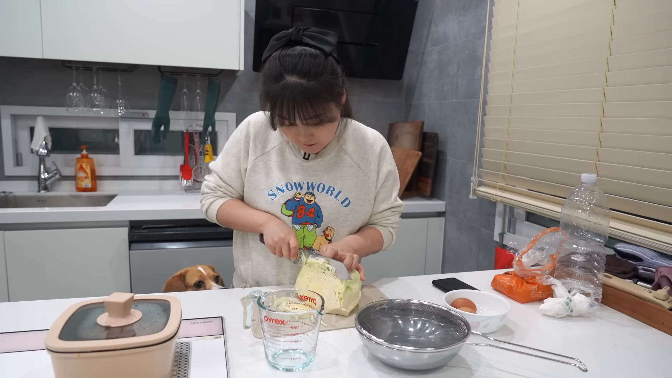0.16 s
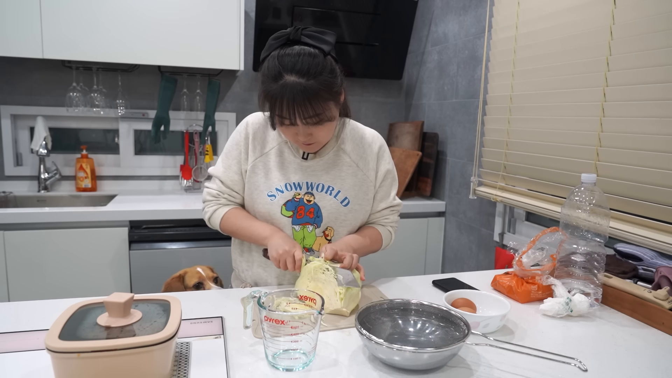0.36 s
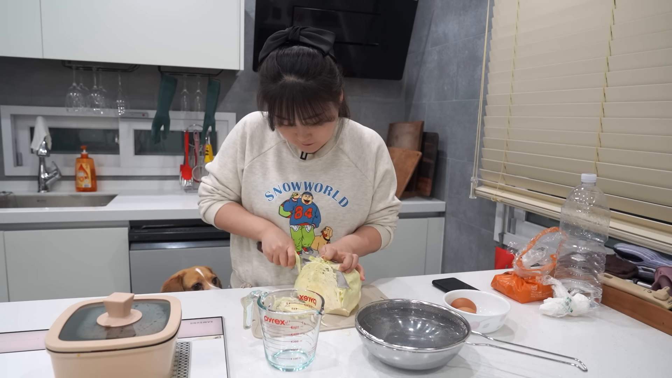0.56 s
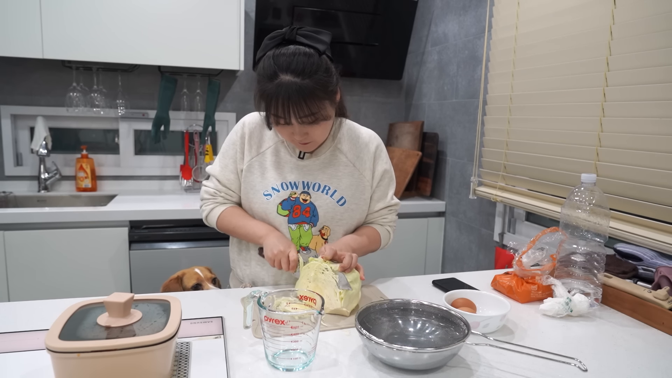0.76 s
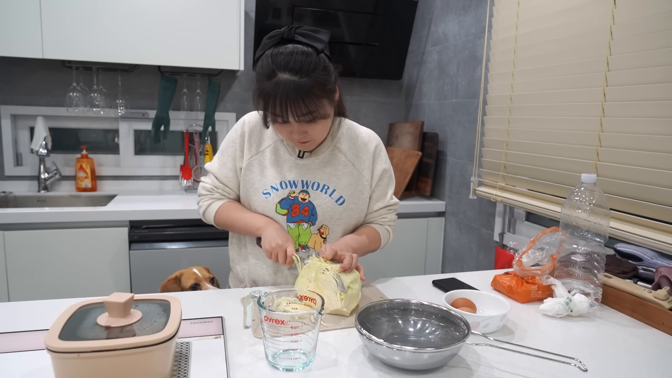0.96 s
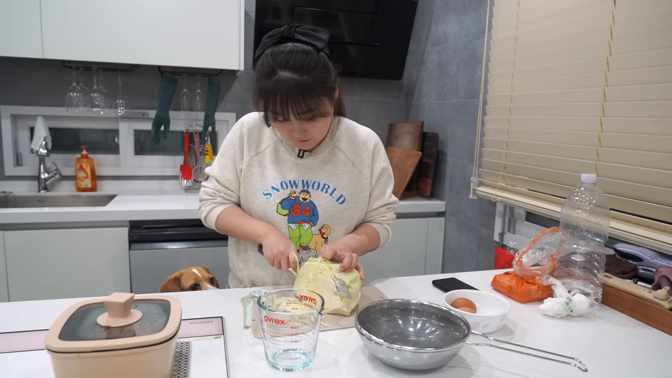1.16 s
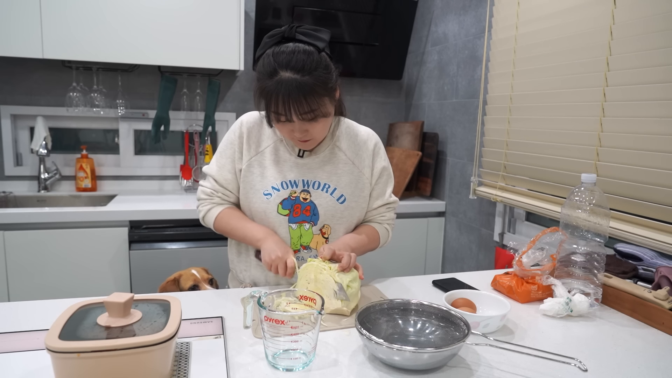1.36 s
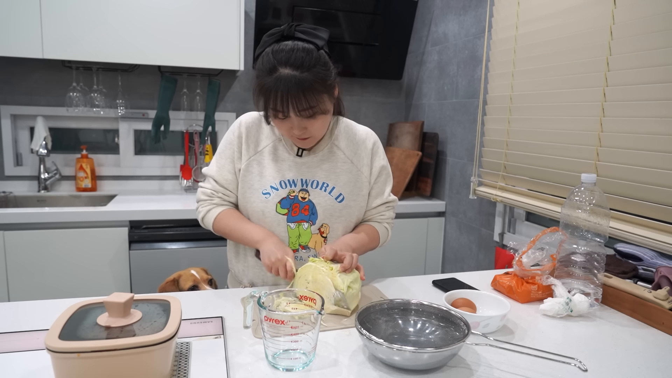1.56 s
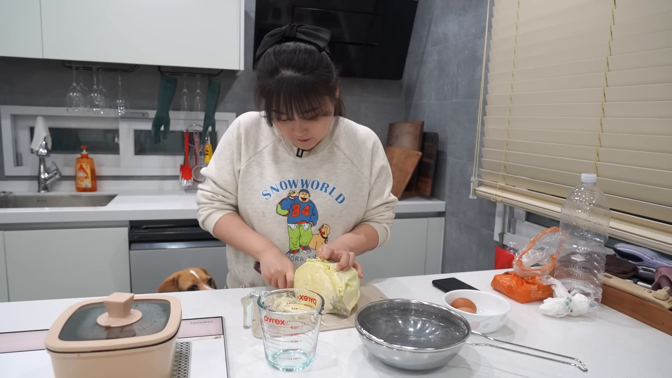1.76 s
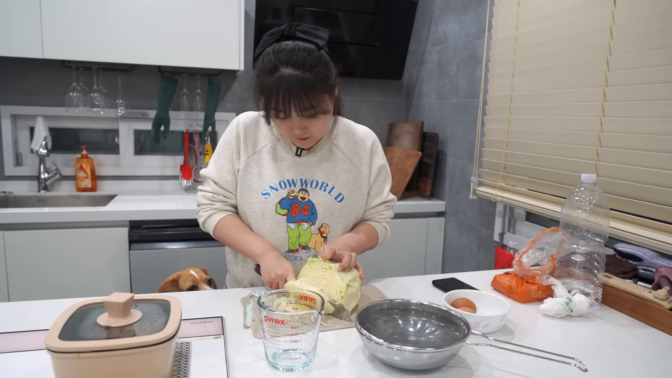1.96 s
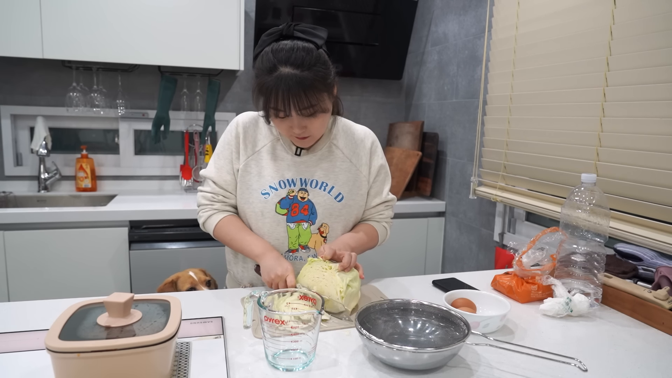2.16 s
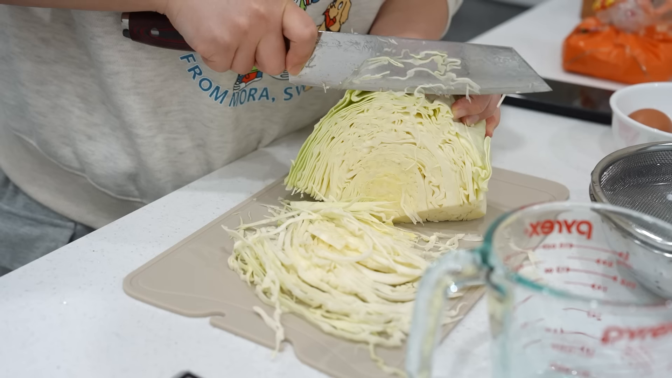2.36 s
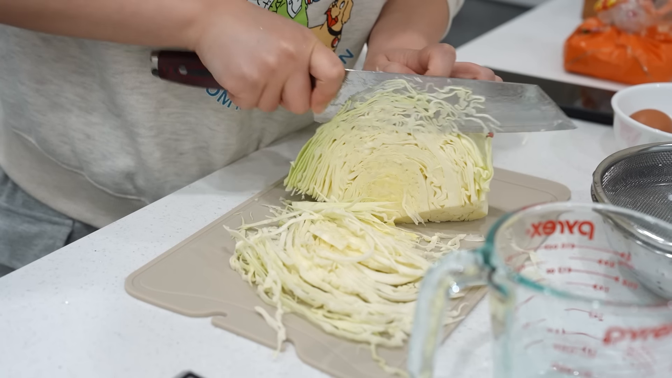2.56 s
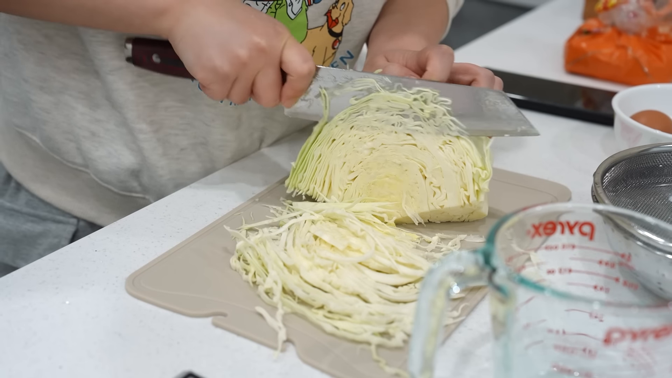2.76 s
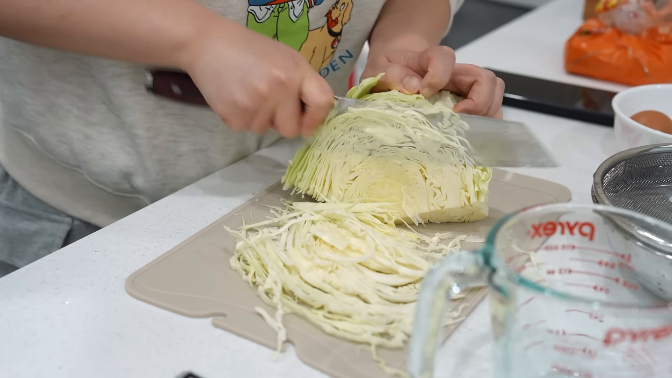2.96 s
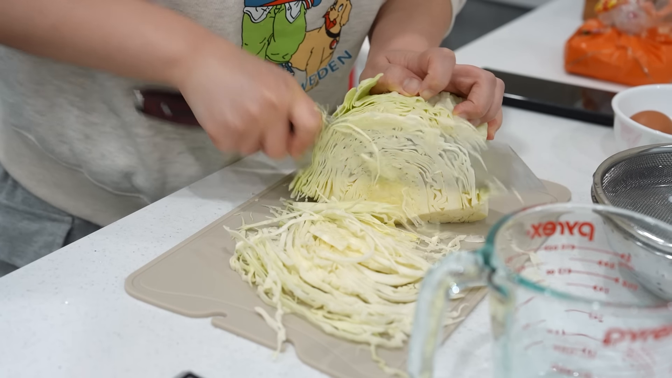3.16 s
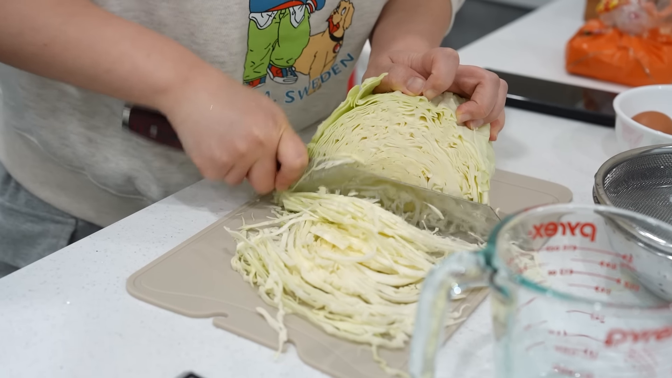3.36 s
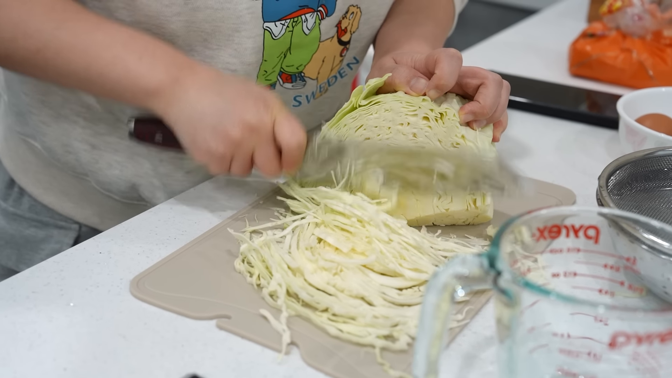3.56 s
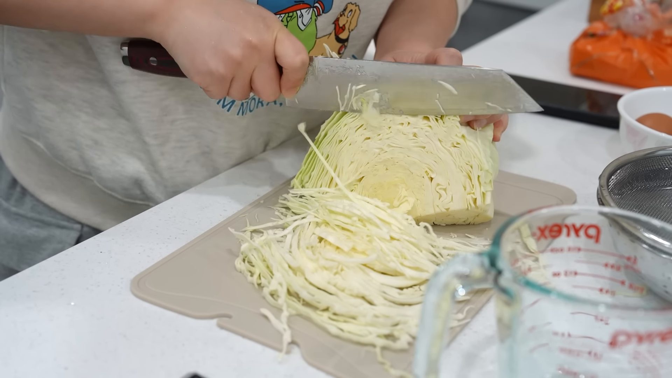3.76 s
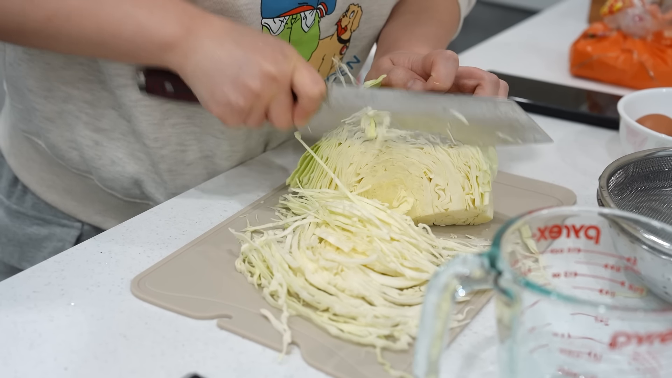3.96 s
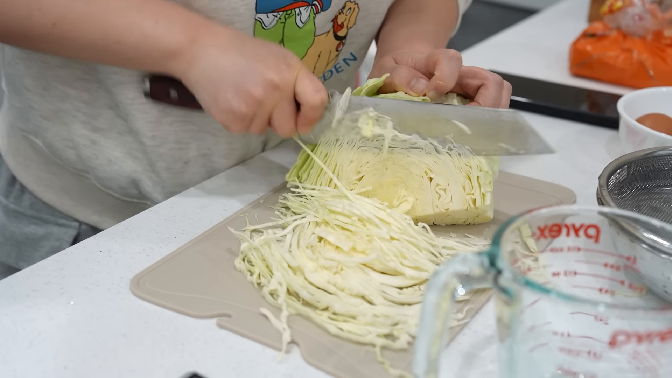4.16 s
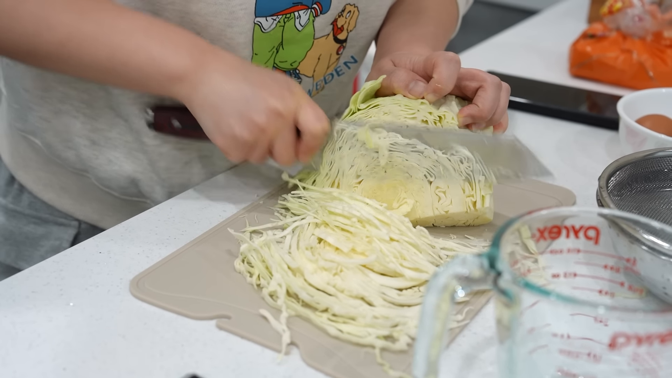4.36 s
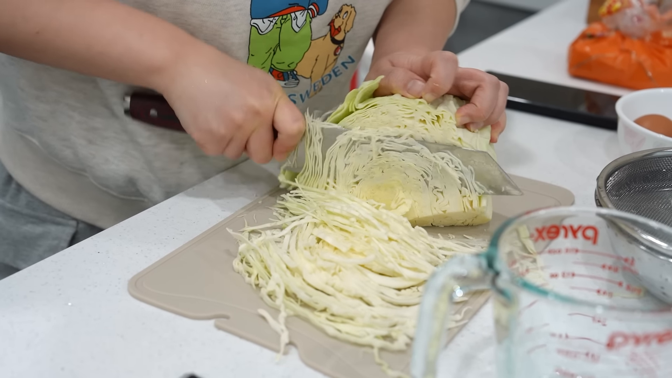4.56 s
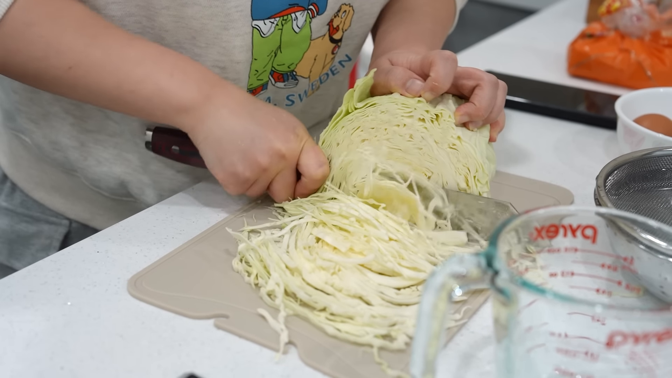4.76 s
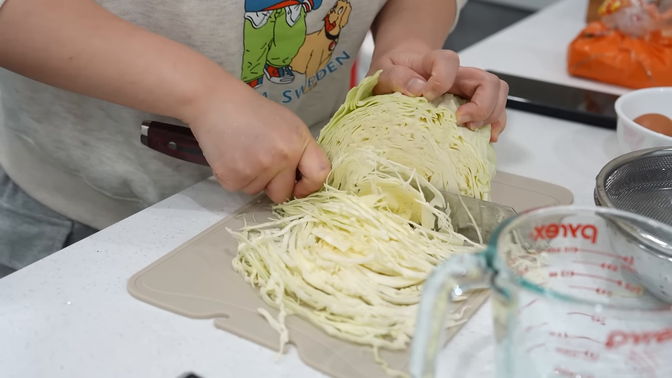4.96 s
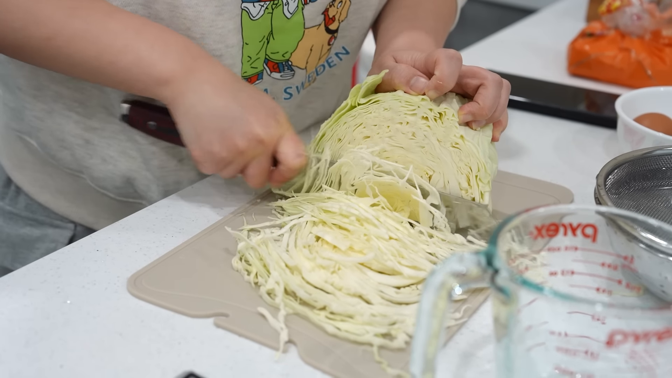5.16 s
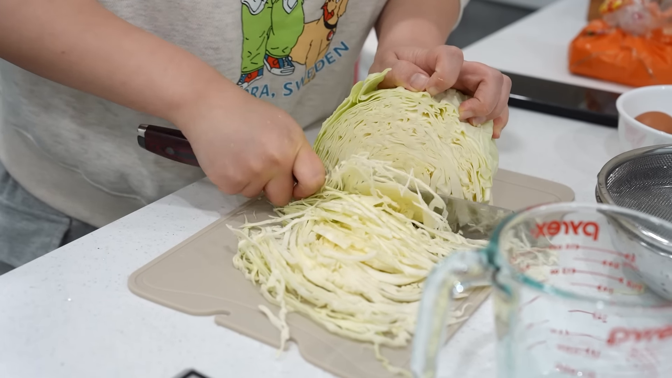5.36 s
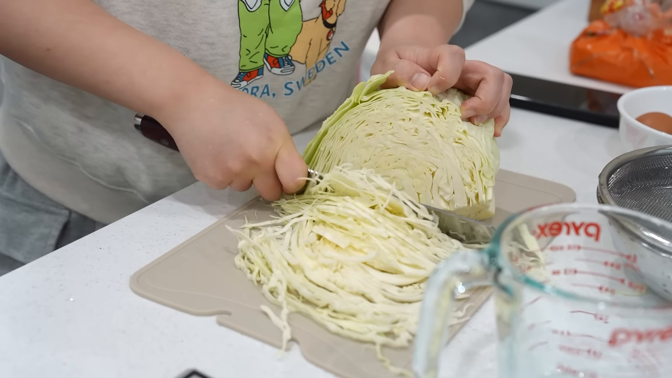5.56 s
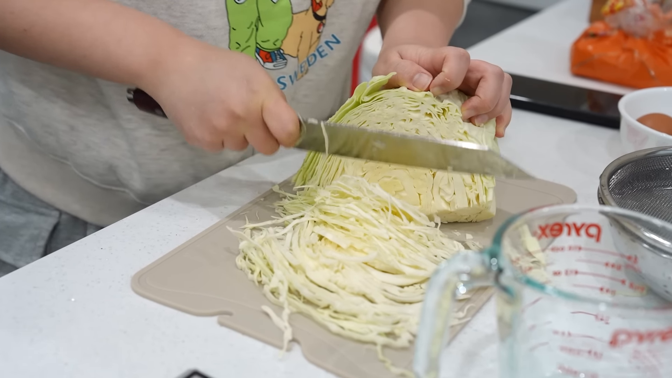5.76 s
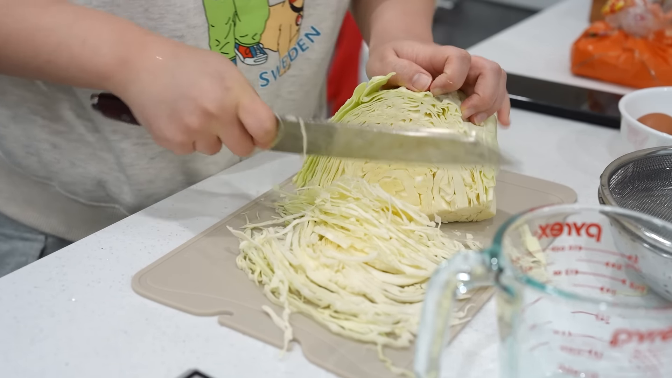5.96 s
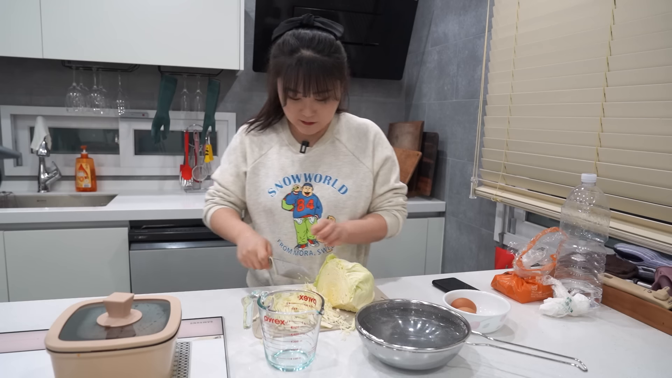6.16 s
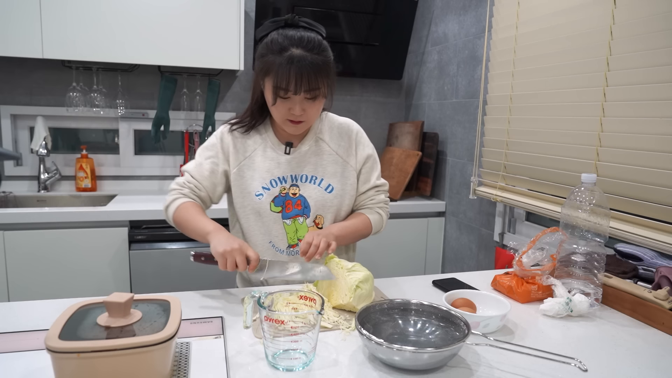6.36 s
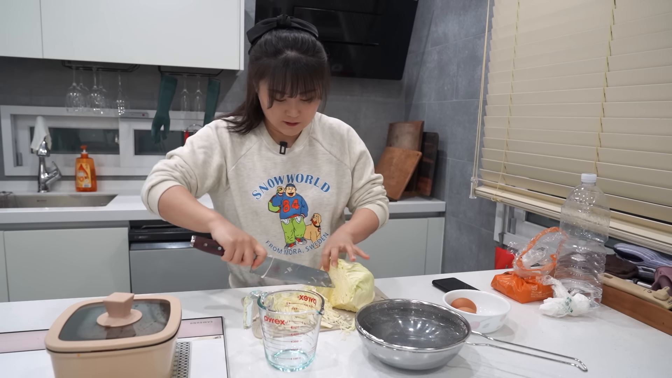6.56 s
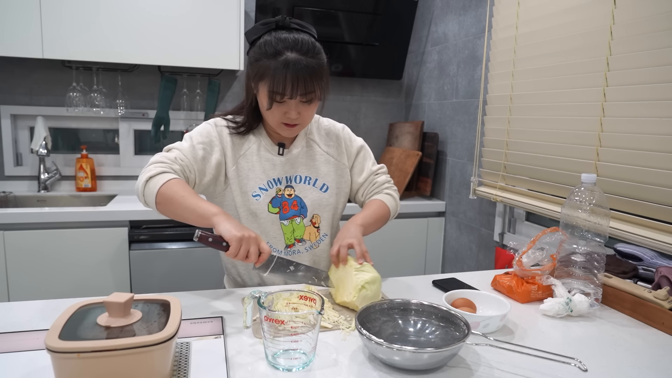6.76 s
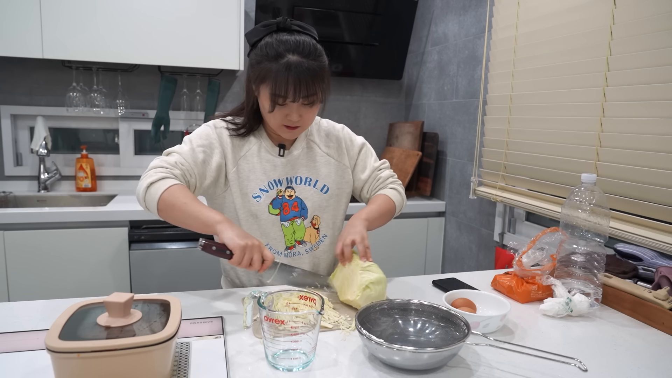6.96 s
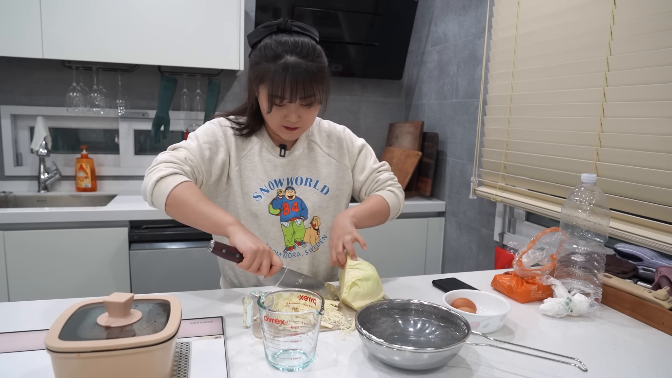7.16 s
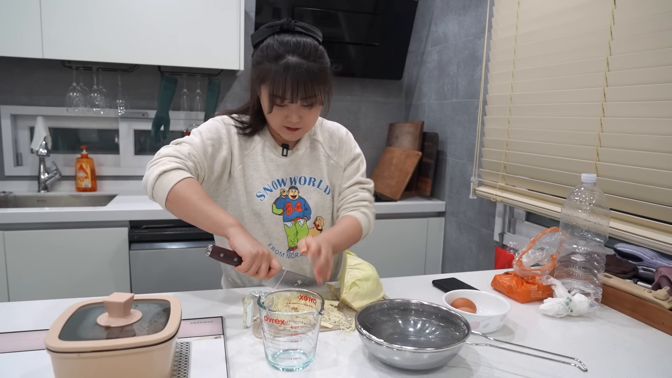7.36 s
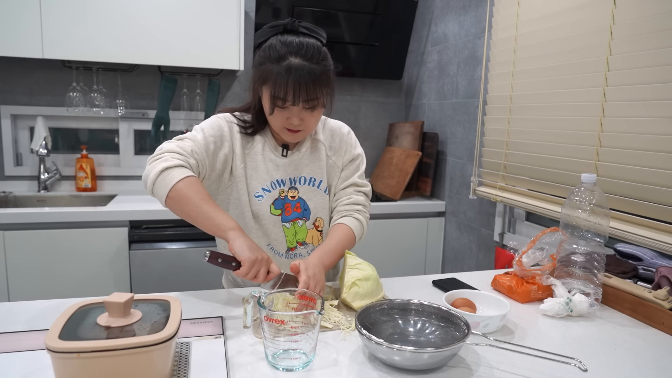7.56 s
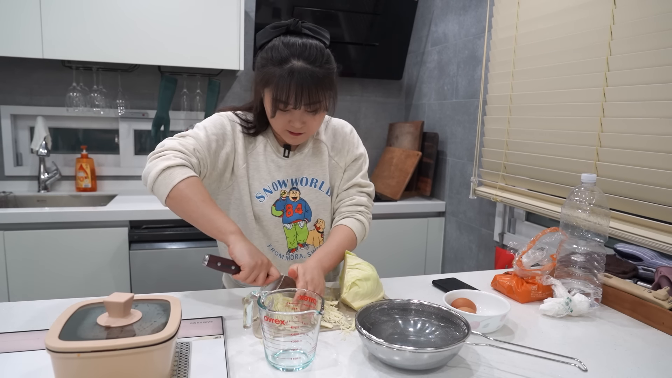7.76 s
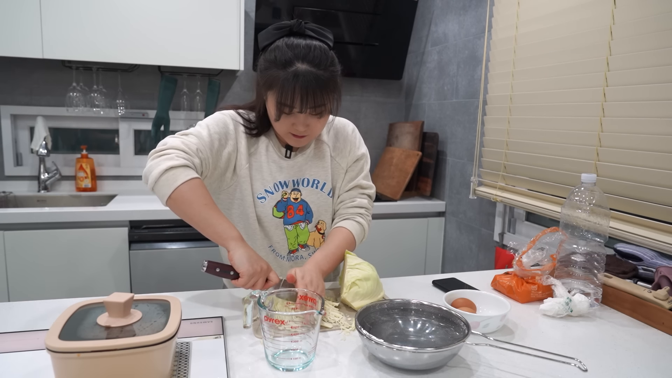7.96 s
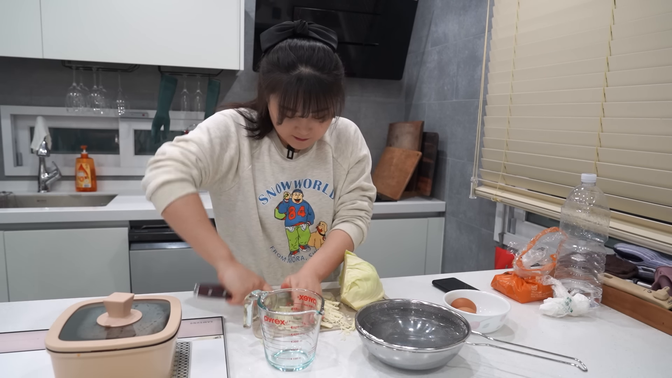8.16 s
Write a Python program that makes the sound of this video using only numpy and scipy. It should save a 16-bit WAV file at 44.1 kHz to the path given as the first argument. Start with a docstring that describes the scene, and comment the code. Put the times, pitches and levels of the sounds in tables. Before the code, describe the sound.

Dense crackling crunches from a blade slicing fresh cabbage, recorded close in stereo, slightly left, with short kitchen reflections and a faint room hush. Brisk strokes first, then a slow squeaking push ending on the board. Crisp snaps and rapid tearing strokes fill the middle, including a strong thud. Rustling strips thin out to near quiet before another slow, lightly tapping, squeaky cut and a last short stroke.

```python
"""A kitchen knife cuts up a wedge of cabbage on a plastic board, heard close up in a small kitchen.
Quick crunching strokes come first, then a slow cut with a squeak that rises as the wet blade slips.
Thick ribs then snap and tear amid more quick strokes; a few cuts go right through and knock on the board.
Loose strips rustle under the sliding blade, and a second slow, squeaky cut leads to one last quick stroke.
The crunch is a swarm of tiny random bursts, the snaps and knocks are short fading notes and noise."""
import sys
import numpy as np
from scipy import signal
from scipy.fft import rfft, irfft, next_fast_len
from scipy.io import wavfile
from scipy.ndimage import map_coordinates

SR = 44100
rng = np.random.default_rng(int(sys.argv[2]) if len(sys.argv) > 2 else 0)


def inscribe(sig):
    """Save sig as 16-bit PCM at rate SR to the path in sys.argv[1].

    A 1-D sig is mono; a 2-D sig holds one channel per row.
    Samples are clipped to [-1, 1] before scaling.
    """
    pcm = np.round(np.clip(np.atleast_2d(sig).T, -1, 1) * 32767)
    wavfile.write(sys.argv[1], SR, pcm.astype(np.int16))


N = 362061  # length in samples
TOP_HZ = 15900  # upper limit of the sound


def amp(db):
    """Decibels to gain."""
    return 10 ** (np.asarray(db) / 20)


def unit(x):
    """Scale to an rms (average strength) of 1."""
    return x / np.sqrt(np.mean(x ** 2) + 1e-20)


def along(points, hz):
    """Read (pitch_hz, value) points at any pitch, on a log axis."""
    point_hz, value = np.transpose(points)
    return np.interp(np.log(hz + 1), np.log(point_hz + 1), value)


def curves(rows):
    """One value per sample for each column after the time."""
    time_s, *columns = np.transpose(rows)
    return [np.interp(np.arange(N) / SR, time_s, column) for column in columns]


def wobble(rate):
    """A smooth random curve with rate random points a second."""
    knots = rng.standard_normal(int(N * rate / SR) + 4)
    return map_coordinates(knots, [np.arange(N) * rate / SR])


def filtered(x, response):
    """Multiply the spectrum of x by a response that depends on pitch."""
    size = next_fast_len(N + SR // 2)
    return irfft(rfft(x, size) * response(np.fft.rfftfreq(size, 1 / SR)), size)[..., :N]


def coloured(x, spectrum, size=2048):
    """Give x a spectrum with a filter that only looks back, so that clicks keep a sharp front."""
    cepstrum = irfft(np.log(amp(along(spectrum, np.fft.rfftfreq(size, 1 / SR)))))
    # folding the second half onto the first makes the filter answer as early as possible
    cepstrum[1:size // 2] *= 2
    cepstrum[size // 2 + 1:] = 0
    return signal.oaconvolve(x, irfft(np.exp(rfft(cepstrum))))[:len(x)]


def band(x, hz, kind, order=2):
    """Low-, high- or band-pass filter that only looks back in time."""
    edges_hz = np.clip(hz, 20, .49 * SR)
    return signal.sosfilt(signal.butter(order, edges_hz, kind, fs=SR, output="sos"), x)


def add(track, start_s, sound):
    """Mix a sound into the track from start_s."""
    part = track[round(start_s * SR):][:len(sound)]
    part += sound[:len(part)]


def bursts(rate, spread_db):
    """Cells bursting at random moments, rate a second, in unequal sizes."""
    happens = rng.random(N) < rate / SR
    size = amp(spread_db * np.clip(rng.standard_normal(N), -2.5, 2.5))
    return happens * size * rng.choice([-1, 1], N) / np.sqrt(rate)


def patchy(x, depth_db, size=512):
    """Every leaf has its own pitch, so the colour of the tearing keeps shifting."""
    z = signal.stft(x, nperseg=size)[2]
    patch = np.outer(np.hanning(8), np.hanning(8))
    field = signal.fftconvolve(rng.standard_normal(z.shape), patch, "same")
    return unit(signal.istft(z * amp(depth_db * unit(field)), nperseg=size)[1][:N])


# colour of the room tone: pitch_hz, level_db (per Hz, relative)
ROOM_COLOUR = [(15, -48), (25, -5.5), (247, -8), (307, -1), (380, -6), (585, -2.5), (1060, -6.5),
               (1180, -5), (1280, -7.5), (2380, -4), (3200, -11.5), (6280, 1), (7790, -23), (10500, -9),
               (15700, -26.5)]


def room_tone(level_db=-51.5):
    """A faint steady hush of coloured noise, mostly alike in both channels."""
    air = rng.standard_normal(N) + .5 * rng.standard_normal((2, N))
    return amp(level_db) * unit(filtered(air, lambda hz: amp(along(ROOM_COLOUR, hz))))


# how long the echoes take to fade by 60 dB: pitch_hz, fade_s
ECHO_FADE = [(100, 0.71), (500, 0.45), (2000, 0.71), (6000, 0.2), (14000, 0.35)]
# how strong the echoes are: pitch_hz, level_db
ECHO_LEVEL = [(100, -7.5), (400, -7.5), (1200, -8.5), (2000, -13.5), (4000, -14.5), (14000, -10.5)]


def kitchen(x, unlike=0.99):
    """Hard walls and cupboards answer with fading noise, partly alike in the two channels."""
    length = SR * 3 // 4
    echoes = unit(rng.standard_normal(length) + unlike * rng.standard_normal((2, length)))
    hz, t, z = signal.stft(echoes, SR, nperseg=256)
    fade_s = along(ECHO_FADE, hz)[:, None]
    fading = amp(along(ECHO_LEVEL, hz)[:, None] - 60 * t / fade_s)
    same_energy = np.sqrt(2 * np.log(1000) / (fade_s * SR))  # long and short fades carry equal energy
    tail = signal.istft(z * fading * same_energy, SR, nperseg=256)[1]
    delayed = np.pad(x, (SR // 250, 0))  # the echoes start 4 ms late
    return signal.fftconvolve(delayed[None], tail, axes=1)[:, :N]


# dull taps of the blade against the wedge: start_s, level_db, pitch_hz, fade_s (time to fall 60 dB)
WEDGE_TAPS = [(3.762, -26, 615, 0.04), (4.256, -31, 545, 0.09), (4.270, -28, 511, 0.1),
              (4.923, -36, 1180, .08), (6.717, -33, 600, .03), (6.748, -23.5, 596, 0.027),
              (6.79, -34, 480, 0.026), (6.881, -23.5, 1810, 0.028), (6.897, -34, 666, 0.055),
              (7.001, -26.5, 617, 0.03)]


def taps():
    """The wedge answers a light tap with one short hollow note."""
    track, t = np.zeros(N), np.arange(SR // 8) / SR
    for start_s, level_db, pitch_hz, fade_s in WEDGE_TAPS:
        add(track, start_s, amp(level_db - 60 * t / fade_s) * np.sin(2 * np.pi * pitch_hz * t))
    return band(track, 460, "highpass")


# the blade meeting the board: start_s, peak_db, low_hz, high_hz (edges of the band that the contact passes)
BOARD_KNOCKS = [(0.661, -31, 298, 560), (1.099, -30, 265, 700), (1.848, -6.5, 214, 1310),
                (3.303, -2.5, 273, 1930), (3.759, -35, 400, 1490), (4.783, -17, 55, 216),
                (7.904, -35, 55, 400)]
# notes of the board on the counter: pitch_hz, level_db (before a small random change), fade_s (to fall 60 dB)
BOARD_NOTES = [(139, -8, .28), (175, -12.5, 0.22), (234, -10.5, 0.27), (305.7, -4, 0.22), (362, -18, 0.23),
               (402, -2.5, 0.08), (484, -6, 0.078), (542, -6, 0.1), (634, -15, 0.25), (824, -14.5, 0.27),
               (890, -20, .14), (1126, -18, .2), (1206, -3.5, 0.15)]


def knocks(push_s=0.00053, push=8, clatter_size=0.99, clatter_fade_s=0.2):
    """One push on the board, then board and counter ring; cabbage under the edge softens the contact."""
    track, t = np.zeros(N), np.arange(SR // 2) / SR
    for start_s, peak_db, low_hz, high_hz in BOARD_KNOCKS:
        ring = 0
        for pitch_hz, level_db, fade_s in BOARD_NOTES:
            fading = amp(level_db + rng.normal(0, 1) - 60 * t / fade_s)
            ring = ring + fading * np.sin(2 * np.pi * (pitch_hz * t + rng.random()))
        shove = push * np.e * (t / push_s) * (1 - t / push_s / 2) * np.exp(-t / push_s)
        # the counter and the dishes on it add a crowd of small resonances
        crowd = unit(band(rng.standard_normal(len(t)), [250, 2200], "bandpass"))
        clatter = clatter_size * crowd * amp(-60 * t / clatter_fade_s)
        onset = 1 - np.exp(-t / 0.00031)
        knock = band(shove + (ring + clatter) * onset, [low_hz, high_hz], "bandpass")
        add(track, start_s, amp(peak_db) * knock / np.abs(knock).max())
    return track


def tremor(body_gain, level_db=-19):
    """The tearing shakes the wedge, and the board under it rumbles faintly."""
    rumble = unit(band(rng.standard_normal(N), [75, 170], "bandpass"))
    return body_gain * amp(level_db) * rumble


# the wet blade squeaking, one list for each slow cut: time_s, pitch_hz, level_db, upper_level_db
SLOW_SQUEAKS = [
    [(1.27, 4320, -54, -70), (1.42, 4676, -34, -33), (1.55, 4840, -32.5, -50), (1.7, 4810, -32, -51),
     (1.79, 5070, -27, -36), (1.86, 5220, -39, -46), (2.0, 5530, -52, -58)],
    [(6.68, 4420, -50, -46), (6.76, 4460, -39, -39), (6.95, 4780, -43, -41.5), (7.12, 4890, -35.5, -42),
     (7.25, 5120, -47, -51), (7.45, 5170, -60, -60)],
]


def squeaks(upper_ratio=1.29, width_hz=240, upper_width_hz=330):
    """Wet steel sticks and slips against the leaves: two hoarse, rising whistles."""
    track, t = np.zeros(N), np.arange(N) / SR
    for rows in SLOW_SQUEAKS:
        pitch_hz, level_db, upper_level_db = curves(rows)
        rubbing = (t > rows[0][0]) & (t < rows[-1][0])
        lower = (pitch_hz, level_db, width_hz)
        upper = (pitch_hz * upper_ratio, upper_level_db, upper_width_hz)
        for hz, db, width in (lower, upper):
            phase = 2 * np.pi * np.cumsum(hz * (1 + .008 * wobble(90))) / SR
            # uneven slips blur the note
            a, b = unit(band(rng.standard_normal((2, N)), width / 2, "lowpass"))
            track += rubbing * amp(db) * (a * np.sin(phase) + b * np.cos(phase))
    return track


# the edge biting suddenly into taut leaves, at the start of a stroke or during one: start_s, level_db
LEAF_BITES = [(0.307, -41), (2.359, -29.5), (2.454, -31), (2.468, -24), (3.157, -29), (3.89, -31.5),
              (4.186, -36), (4.36, -24), (4.922, -26.5), (5.129, -38), (7.84, -33), (8.122, -31.5),
              (8.165, -50)]


def bites(fade_s=0.07):
    """Taut leaves give way at once in a rush of bursts, then the cut settles."""
    level, t = np.zeros(N), np.arange(SR // 8) / SR
    for start_s, level_db in LEAF_BITES:
        add(level, start_s, amp(level_db - 60 * t / fade_s))
    grit = unit(band(bursts(5000, spread_db=7.5), [1400, 6000], "bandpass"))
    return level * grit


# a thick rib giving way in one rush: start_s, level_db, length_s
RIB_SPLITS = [(2.383, -31, 0.0086), (2.535, -20, 0.0069), (3.283, -8.5, 0.01), (4.769, -20, 0.024),
              (7.904, -25, 0.0056)]


def splits():
    """A thick rib tears in a few milliseconds of packed fractures."""
    track, t = np.zeros(N), np.arange(SR // 25) / SR
    for start_s, level_db, length_s in RIB_SPLITS:
        rush = unit(band(rng.standard_normal(len(t)), [2300, 5200], "bandpass"))
        shape = (1 - np.exp(-t / .0006)) * np.exp(-(t / length_s) ** 4)
        add(track, start_s, amp(level_db) * rush * shape)
    return track


# single snaps of ribs and light ticks of the blade, strong and faint: start_s, level_db, pitch_hz, treble_db
SINGLE_SNAPS = [(0.0948, -16, 3080, -10), (0.1486, -13.5, 2730, 5), (0.745, -19, 5660, -3),
                (1.2523, -18.5, 2480, -6), (2.1143, -12.5, 1720, -21), (2.1377, -9, 1777, -10),
                (2.1453, 1, 1845, -18.5), (2.3897, -8, 2160, -3), (2.4846, -3, 5700, -3),
                (2.5337, -3, 4370, -10), (2.556, -2, 2150, -13), (2.5778, -2, 2520, -16),
                (2.7422, -13, 2940, -9), (3.0609, -13.5, 2620, -22.5), (3.761, -9.5, 2330, -11),
                (3.787, -15.5, 2350, -7), (3.8168, -18.5, 3400, -14), (3.9464, -8.5, 3660, -18),
                (3.984, -6, 2210, -25), (4.388, -6, 2540, -24), (4.572, -9, 2950, -17),
                (4.6136, -8.5, 2390, -19), (4.8572, -9.5, 3550, -13), (4.869, -9, 3700, -13),
                (4.8934, -8.5, 5270, -19), (4.9217, -13, 3290, -5), (5.0517, -18, 5240, -20),
                (5.6284, -14.5, 2540, -11), (5.6622, -11.5, 2570, -14), (5.778, -22, 1820, -10),
                (5.807, -25, 4670, 2), (6.232, -18.5, 11050, 4.5), (6.2795, -20.5, 5700, -16),
                (6.3089, -17.5, 3930, -14), (6.3994, -33.5, 5760, 10), (6.626, -14, 2380, -8),
                (6.7171, -14, 4400, -9), (6.7354, -8.5, 4770, -22), (6.7494, -12, 5650, -13),
                (6.7907, -13, 5730, -5), (7.8803, -13.5, 4550, -2), (7.9028, -5.5, 5750, -0.5),
                (8.1653, -9.5, 5500, 3)]
# thin veins snap at random; their level is for a crunch of 0 dB, pitch in the middle of one octave
VEINS_PER_S, VEIN_DB, VEIN_HZ, VEIN_TREBLE_DB = 13, -6.5, 3000, -7
VEIN_FOLLOWS = 0.48  # dB by which they grow for each dB of crunch


def snaps(crisp_gain, rib_fade_s=0.0087):
    """Each snap is a sharp crack and a few cycles of the rib that broke; it is too small to move any bass."""
    track, t = np.zeros(N), np.arange(SR // 40) / SR
    events = list(SINGLE_SNAPS)
    for at, size, pitch in rng.random((int(VEINS_PER_S * N / SR), 3)):
        crunch_db = 20 * np.log10(crisp_gain[int(at * N)])
        vein_db = VEIN_FOLLOWS * crunch_db + VEIN_DB + 8 * (size - .5)
        events.append((at * N / SR, vein_db, VEIN_HZ * 2 ** (pitch - .5), VEIN_TREBLE_DB))
    for start_s, level_db, pitch_hz, treble_db in events:
        grit = rng.standard_normal((2, len(t)))
        rib = np.sin(2 * np.pi * pitch_hz * t) * amp(-60 * t / rib_fade_s)
        crack = unit(band(grit[0], [1400, 6000], "bandpass", order=3)) * amp(-60 * t / 0.014)
        spray = unit(band(grit[1], [7500, 12000], "bandpass")) * amp(treble_db - 60 * t / 0.0055)
        add(track, start_s, amp(level_db) * (0.5 * rib + 0.2 * crack + 0.28 * spray))
    return band(track, 970, "highpass", order=3)


def gesture(age, length, attack_s, release_s, settle_db, settle_s):
    """Gain of one move of the blade: attack, hold, release, then the leaves settle."""
    rise = .5 + .5 * np.tanh(age / attack_s / 2)
    hold = .5 + .5 * np.tanh((length - age) / release_s / 2)
    settle = amp(settle_db) * np.exp(-np.maximum(age - length, 0) / settle_s)
    return rise * (hold + settle)


# quick strokes down through the wedge: start_s, attack_s, length_s, crunch_db,
# swell_db (from start to end), body_db and fizz_db (both relative to the crunch)
QUICK_CUTS = [(-0.02, 0.0097, 0.094, -24, -8.5, -13, -7.5), (0.303, 0.0066, .1, -26, -0.5, -15, -8),
              (0.634, 0.015, 0.055, -28, -1.5, -10, -9.5), (1.016, 0.018, 0.089, -29.5, 8.5, -11.5, -8.5),
              (2.469, 0.0094, .15, -23.5, 3.5, -11.5, -11), (2.867, 0.016, 0.087, -24, -6.5, -14.5, -11),
              (3.151, 0.012, 0.15, -25.5, 16, -13, -12), (3.89, .003, 0.069, -32, -1, -11, -15),
              (3.98, 0.017, 0.12, -23.5, -11.5, -15, -13.5), (4.359, 0.0085, 0.11, -25, 3.5, -13.5, -13.5),
              (4.657, 0.0093, .13, -27.5, 14.5, -11.5, -12), (8.157, 0.022, 0.055, -28.5, 11, -13.5, -5)]
CUT_RELEASE_S = 0.0055  # the edge comes out of the leaves
CUT_SETTLE_DB, CUT_SETTLE_S = -9.5, 0.076  # the fresh strips peel off after a stroke
# the flat of the blade sliding along the cut face or through the strips:
# start_s, length_s, rubbing_db, body_db and fizz_db (both relative to the rubbing)
BLADE_SLIDES = [(0.141, 0.023, -32, -16, -6), (0.434, 0.072, -41, -13, -8),
                (0.811, 0.062, -38.5, -11.5, -6), (1.182, 0.041, -34.5, -13, -12),
                (2.369, 0.025, -33.5, -15, -11), (2.681, 0.087, -37, -14, -11.5),
                (2.994, 0.087, -34.5, -14, -15), (3.464, 0.053, -42.5, -5, -6),
                (3.765, 0.031, -40, -21, -11), (4.196, 0.063, -31.5, -14.5, -17),
                (4.502, 0.072, -30, -13, -16.5), (4.605, 0.025, -32.5, -5, -15),
                (4.838, 0.15, -38.5, -17, -13.5), (5.14, 0.025, -33, -12.5, -16),
                (5.2, 0.095, -44.5, -14, -14), (5.352, 0.15, -38, -11.5, -13.5),
                (5.521, 0.29, -46.5, -6.5, -8.5), (5.83, 0.22, -52, -5, -8.5),
                (6.03, 0.059, -41.5, -10, -5)]
SLIDE_ATTACK_S, SLIDE_RELEASE_S = 0.0088, 0.0072
SLIDE_SETTLE_DB, SLIDE_SETTLE_S = -9, 0.21  # the strips keep rustling
# two slow cuts follow the push of the hand, one list each:
# time_s, crunch_db, body_db and fizz_db (both relative to the crunch)
SLOW_PUSHES = [
    [(1.28, -59, -20, -16), (1.384, -29, -14.5, -8.5), (1.444, -25, -13.5, -8.5), (1.699, -35, -18.5, -8),
     (1.848, -21, -13.5, -8.5), (2.015, -28.5, -17.5, -2.5), (2.14, -37, -18, -19), (2.26, -55, -9, -9)],
    [(6.51, -58, -8, -6), (6.563, -33, -24, -9.5), (6.667, -41, -11, -7), (6.727, -35.5, -15.5, -13.5),
     (7.019, -34, -14.5, -12.5), (7.47, -42.5, -10, -14), (7.8, -41.5, -15.5, -6),
     (7.902, -32, -12.5, -7.5), (7.984, -44, -13, -14), (8.14, -42.5, -14, -20)],
]


def cutting():
    """Loudness of the crisp middle, the hollow body and the juicy fizz, summed over all moves of the blade."""
    t = np.arange(0, N / SR, .001)
    power = 0

    def three_gains(db, body_db, fizz_db):
        """Gains of middle, body and fizz."""
        return amp([db, db + body_db, db + fizz_db])

    for start_s, attack_s, length_s, crunch_db, swell_db, body_db, fizz_db in QUICK_CUTS:
        age = t - start_s
        push_db = crunch_db + swell_db * (np.clip(age / length_s, 0, 1) - .5)
        move = gesture(age, length_s, attack_s, CUT_RELEASE_S, CUT_SETTLE_DB, CUT_SETTLE_S)
        power += (three_gains(push_db, body_db, fizz_db) * move) ** 2
    for start_s, length_s, *levels_db in BLADE_SLIDES:
        move = gesture(t - start_s, length_s, SLIDE_ATTACK_S, SLIDE_RELEASE_S,
                       SLIDE_SETTLE_DB, SLIDE_SETTLE_S)
        power += np.outer(three_gains(*levels_db), move) ** 2
    for rows in SLOW_PUSHES:
        time_s, *levels_db = np.transpose(rows)
        during = (t > time_s[0]) & (t < time_s[-1])
        power += (three_gains(*[np.interp(t, time_s, db) for db in levels_db]) * during) ** 2
    return curves(np.column_stack([t, *np.sqrt(power)]))


# colour of the crunch in the first strokes: pitch_hz, level_db (per Hz, relative)
FIRST_COLOUR = [(88, -32.5), (150, -26), (189, -26), (269, -19), (367, -7), (446, -9.5), (521, -2.5),
                (1070, -8), (1960, 2), (3120, -1), (5820, 2.5), (7640, -5.5), (12900, -9), (15700, -27)]
# the same for the quick shredding: pitch_hz, level_db
SHRED_COLOUR = [(88, -53), (150, -25.5), (169, -36), (230, -12.5), (269, -27.5), (302, -13.5), (473, -7.5),
                (521, -3), (815, -11.5), (2110, 0.5), (2830, -2.5), (5380, -1.5), (7350, -15), (12200, -11),
                (15700, -38)]
# the same for the loose strips: pitch_hz, level_db
LOOSE_COLOUR = [(88, -55), (150, -23), (230, -9), (314, -14), (346, -9.5), (397, -10), (521, 0.5),
                (784, -6.5), (971, -2), (1160, -10.5), (2420, -2), (5380, -5.5), (8100, -16), (11700, -10),
                (15700, -28)]
# the same for the slow cut through the wedge: pitch_hz, level_db
WEDGE_COLOUR = [(88, -38), (150, -35), (182, -16.5), (264, -27), (360, -20), (492, -6.5), (784, -11),
                (934, -10), (1200, -13), (2030, -2), (2830, -4.5), (5820, -2.5), (7640, -17.5),
                (10800, -14), (15700, -29.5)]
COLOUR_CHANGES_S = [2.3, 5.05, 6.52]  # when the next colour takes over


def crunch(crisp_gain, body_gain, fizz_gain, layers_per_s=110, layer_s=.003, layer_size=0.71, rubbing=0.47):
    """Harder cutting bursts more cells a second; they come in clumps, leaf after leaf."""
    force = (crisp_gain * amp(25.5)) ** .3
    layer_starts = rng.random(N) < layers_per_s / SR
    clumps = signal.lfilter([1], [1, -np.exp(-1 / (layer_s * SR))], layer_starts)
    cells = unit(bursts(2800 * force, spread_db=2.0) * (1 + layer_size * clumps))
    # a steady rub of the flat of the blade, which shows more in light strokes
    rub = rubbing * rng.standard_normal(N)
    tearing = patchy(force * cells + rub, depth_db=2.5) / np.hypot(force, rubbing)
    stretch = np.searchsorted(COLOUR_CHANGES_S, np.arange(N) / SR)
    colours = (FIRST_COLOUR, SHRED_COLOUR, LOOSE_COLOUR, WEDGE_COLOUR)
    leaves = [coloured(tearing, colour) for colour in colours]

    def part(low_hz, high_hz):
        """One pitch range at equal strength in every colour, switched in time."""
        ranges = [unit(filtered(x, lambda hz: (hz >= low_hz) & (hz < high_hz))) for x in leaves]
        return np.choose(stretch, ranges)

    body, crisp, fizz = part(0, 1200), part(1200, 7000), part(7000, TOP_HZ)
    return body_gain * body + crisp_gain * crisp + fizz_gain * fizz


# steady lean to the left at each pitch: pitch_hz, left_share (negative leans right)
LEFT_LEAN = [(100, 0.37), (400, 0.29), (1300, 0.092), (4400, 0.077), (8500, -0.031), (14000, -0.64)]
# strength of the scattered difference between the ports: pitch_hz, level_db
PORT_SPREAD = [(2000, -21.5), (4500, -23), (6000, -37), (8200, -8), (10200, -4), (11500, -7.5), (13000, 7),
               (14500, 17.5), (15700, 13)]
# where the blade works on the board: time_s, extra_left_share
BLADE_PLACE = [(0, -0.036), (2.5, -0.0033), (5.1, 0.04), (6.1, -0.029), (8.2, -0.042)]


def ports(knife, scatter_radians=1.6, scatter_per_s=350, wander=0.066):
    """Half the difference between the ports; cells burst all along the blade, so its phase keeps changing."""
    place, = curves(BLADE_PLACE)
    turning = np.exp(1j * scatter_radians * wobble(scatter_per_s))
    scattered = np.real(signal.hilbert(knife, next_fast_len(N))[:N] * turning)
    lean = filtered(knife, lambda hz: along(LEFT_LEAN, hz))
    spread = filtered(scattered, lambda hz: 1j * amp(along(PORT_SPREAD, hz)))  # 1j: a quarter-cycle shift
    return lean + spread + (place + wander * wobble(55)) * knife


def scene():
    """The board lies a little to the left; the two microphone ports disagree in the top treble."""
    crisp_gain, body_gain, fizz_gain = cutting()
    breaking = bites() + splits() + snaps(crisp_gain)
    cabbage = crunch(crisp_gain, body_gain, fizz_gain) + breaking + squeaks()
    knife = cabbage + tremor(body_gain) + knocks() + taps()
    side = ports(knife)
    return np.array([knife + side, knife - side]) + kitchen(knife) + room_tone()


def record(dry):
    """The recorder clips at full scale and keeps nothing above its band limit."""
    return filtered(np.clip(dry, -1, 1), lambda hz: hz < TOP_HZ)


dry = scene()
out = record(dry)
inscribe(out)
```